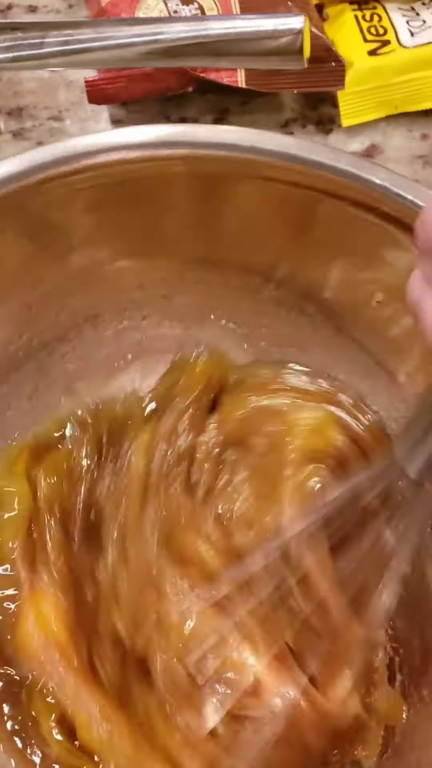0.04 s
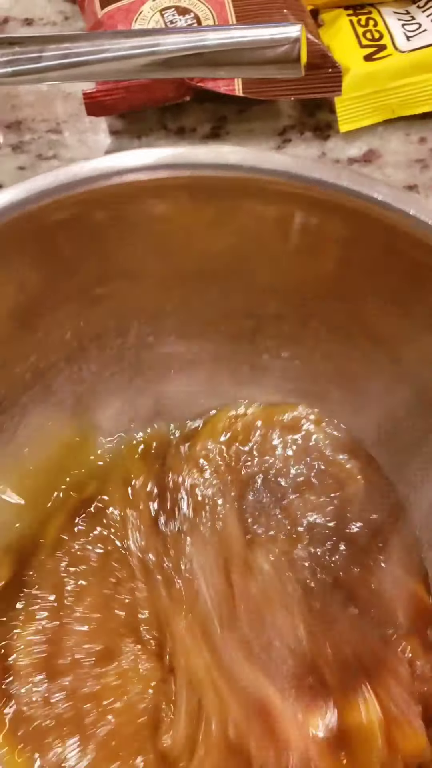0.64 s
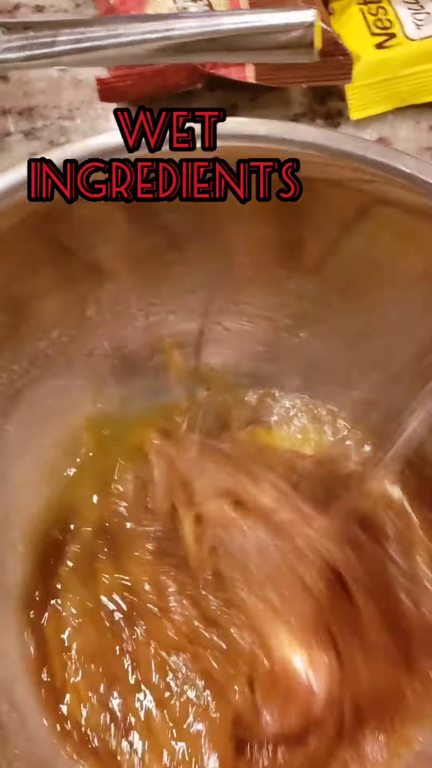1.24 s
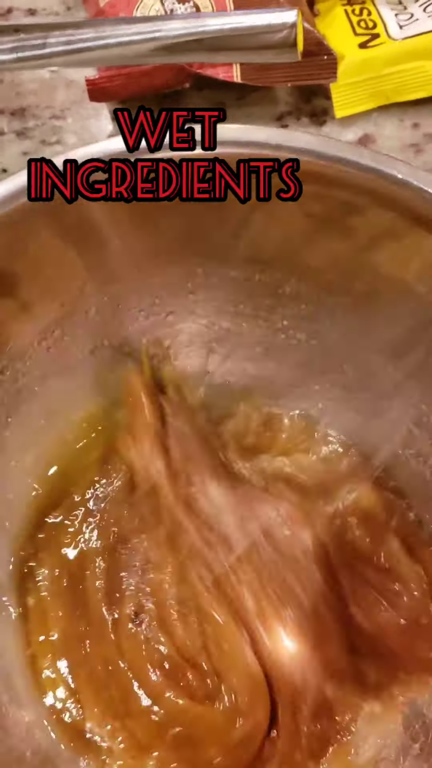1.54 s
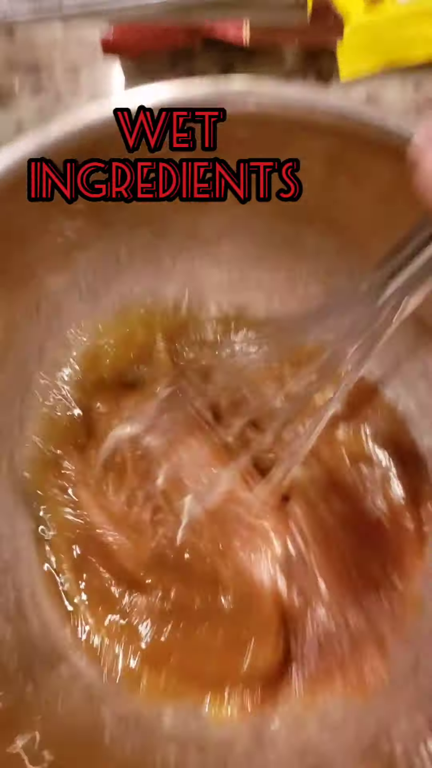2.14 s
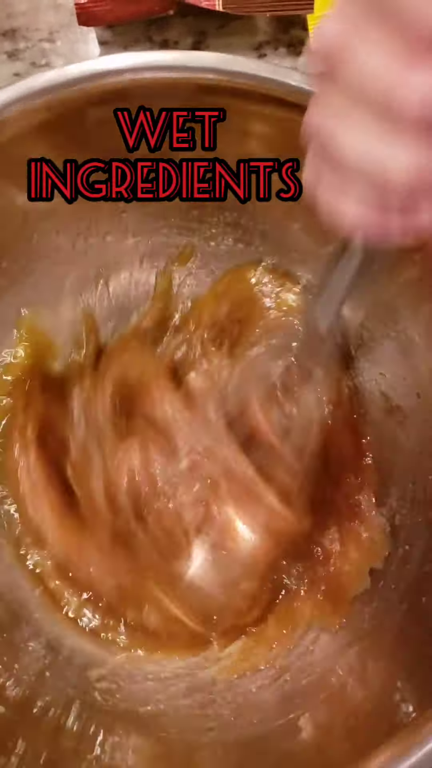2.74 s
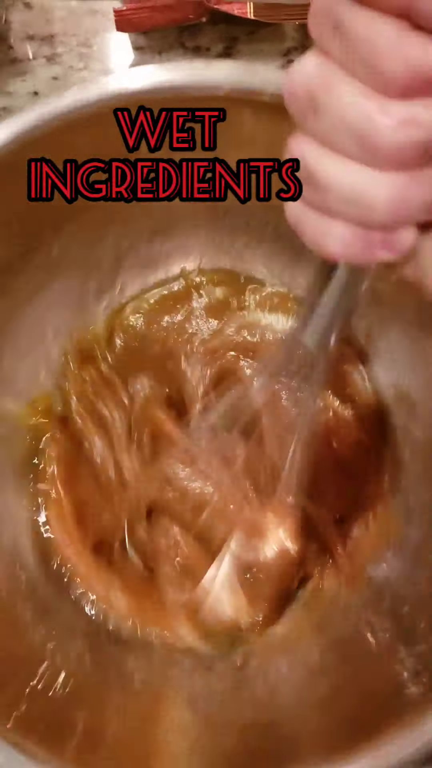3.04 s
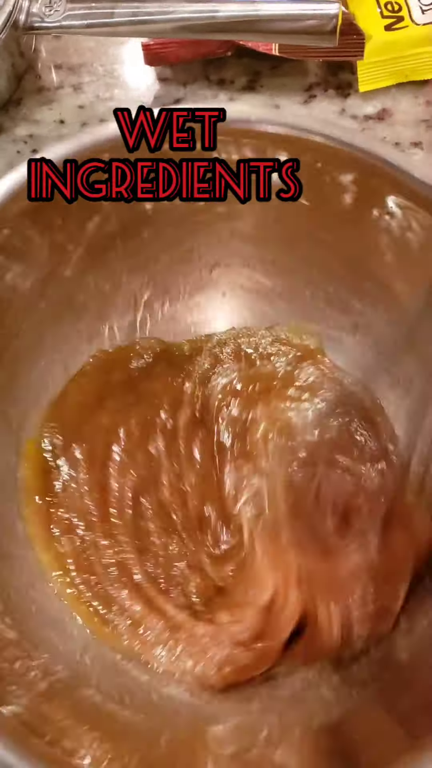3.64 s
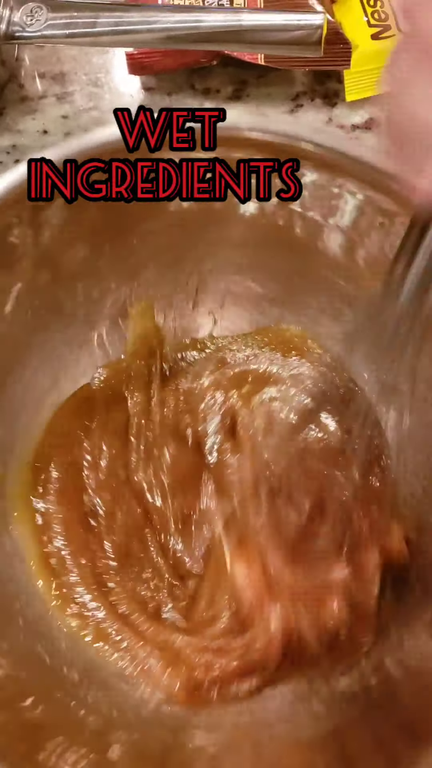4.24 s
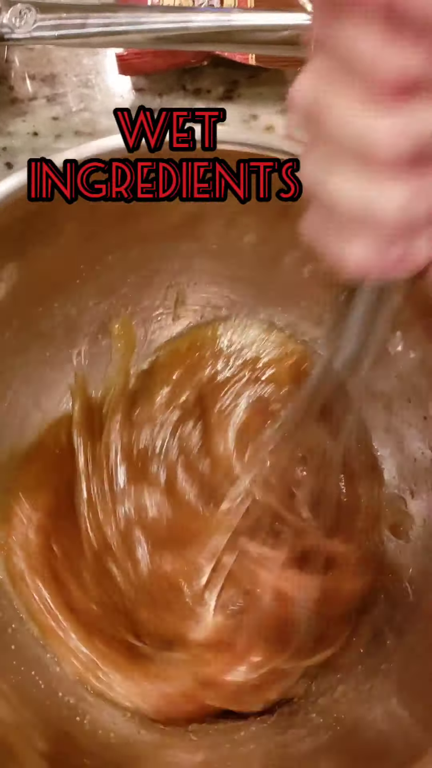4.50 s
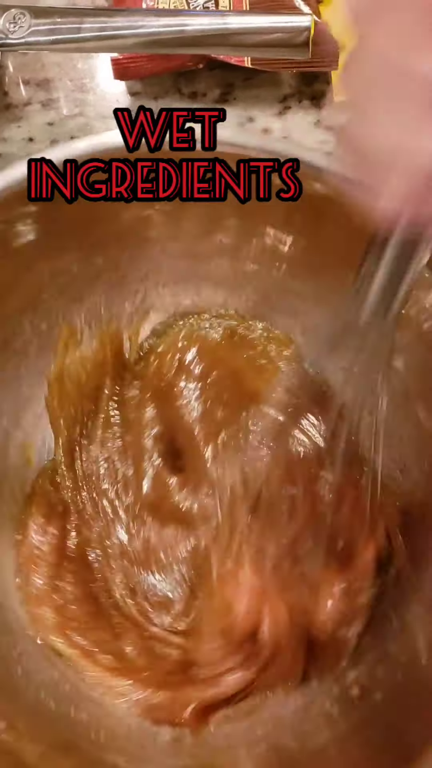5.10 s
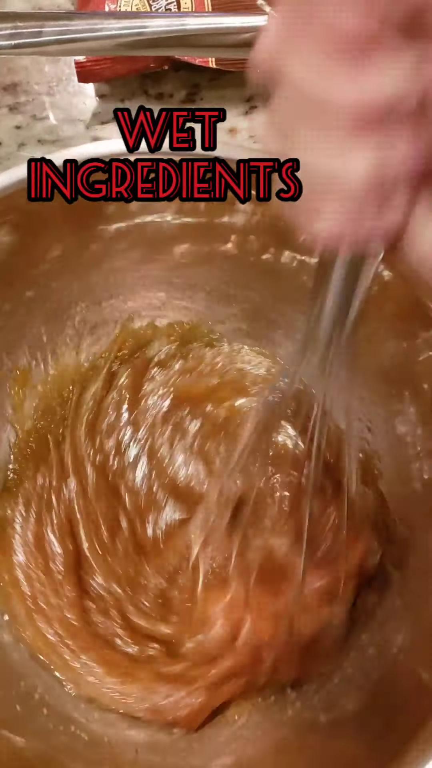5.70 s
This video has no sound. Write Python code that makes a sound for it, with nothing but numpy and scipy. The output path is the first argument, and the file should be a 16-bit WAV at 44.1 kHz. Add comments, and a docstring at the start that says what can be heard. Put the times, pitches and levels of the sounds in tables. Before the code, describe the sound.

From the first moment, a wire whisk beats runny batter in a steel bowl, quickly and evenly, at about seven strokes a second. Each stroke is a bright, sizzling scrape with a small rattle, joined by rounded wet plops, short squelches and a fine crackle of bubbles. Dull clicks of coated wire come irregularly. A short, high metallic ping sounds right at the start, with a few lighter ones around 0.6, 1.7 and 2.8 seconds. From about 3.5 seconds the pings come more often, the clearest near 3.9, 5.1 and 5.2 seconds. Underneath, the bowl hums softly and rocks on the counter with faint low thuds. The whisking keeps its pace until about 6 seconds, easing slightly in the last strokes. Everything is heard from close above, with the short echo and faint hush of a small kitchen.

```python
"""Quick, wet scraping and plopping: a wire whisk beats runny batter in a steel bowl, about seven strokes a second.
In each stroke the wires scrape, rattle and tap along the steel. Now and then one hits the bare wall and pings.
Air pockets in the batter close with plops and squelches, and small bubbles pop and crackle.
Underneath, the bowl hums and rocks on the counter. It is all heard from close above, in a small kitchen."""
import sys
import numpy as np
from scipy import signal
from scipy.fft import rfft, irfft
from scipy.io import wavfile
from scipy.ndimage import uniform_filter1d

SR = 44100
rng = np.random.default_rng(int(sys.argv[2]) if len(sys.argv) > 2 else 0)


def inscribe(sig):
    """Save sig as 16-bit PCM at rate SR to the path in sys.argv[1].

    A 1-D sig is mono; a 2-D sig holds one channel per row.
    Samples are clipped to [-1, 1] before scaling.
    """
    pcm = np.round(np.clip(np.atleast_2d(sig).T, -1, 1) * 32767)
    wavfile.write(sys.argv[1], SR, pcm.astype(np.int16))


N = 262836

# Levels in the tables are relative. fade_s is the time a sound takes to die away by 60 dB.
# One turn of the whisk: the wires bite as they land, drag, then bunch up and skip before they lift.
# start_s, drag_db, bite_db, skip_after_s, skip_db
STROKES = [(.015, -34, -33, 0.051, -28.5), (0.159, -37.5, -25.5, 0.054, -25), (0.307, -36, -49, 0.057, -36),
           (.456, -37.5, -20.5, 0.043, -24.5), (0.598, -35, -36, 0.034, -26),
           (.737, -34, -26.5, 0.03, -17.5), (0.873, -33, -22, 0.031, -16.5),
           (1.014, -29.5, -26, 0.029, -21), (1.152, -30, -43, .028, -18.5), (1.292, -29, -28.5, 0.033, -18),
           (1.430, -31, -36, 0.031, -18.5), (1.569, -30.5, -22, .043, -22.5),
           (1.722, -36, -19.5, .047, -25), (1.863, -35, -53, 0.039, -21), (2.007, -38, -26.5, 0.05, -23.5),
           (2.171, -34.5, -39, 0.034, -29), (2.310, -35.5, -32, .055, -15), (2.463, -34, -29.5, 0.03, -48),
           (2.594, -33.5, -22, 0.047, -22), (2.746, -35, -26.5, .044, -29.5),
           (2.889, -33, -28.5, 0.03, -32.5), (3.03, -31.5, -36, 0.031, -23.5),
           (3.183, -37, -27, 0.048, -29), (3.335, -36, -34, 0.042, -25.5), (3.47, -38, -29, 0.052, -21),
           (3.63, -38, -26, 0.051, -55), (3.767, -35.5, -51, .040, -22.5), (3.898, -30.5, -43, 0.054, -44),
           (4.052, -35, -28.5, .050, -19.5), (4.212, -30, -25.5, 0.03, -20.5),
           (4.356, -36.5, -27, 0.037, -24.5), (4.492, -31, -39, 0.042, -39), (4.634, -32, -40, 0.044, -20),
           (4.77, -33.5, -50, 0.033, -22.5), (4.917, -41, -41, 0.056, -24), (5.052, -31, -26.5, 0.062, -39),
           (5.213, -37.5, -29, 0.054, -25), (5.361, -37.5, -27, 0.047, -25),
           (5.488, -38, -36, 0.074, -22.5), (5.65, -36, -49, 0.057, -36), (5.786, -38.5, -29, 0.059, -30),
           (5.933, -44, -47, 0.022, -30.5)]
# Taps of a batter-coated wire: start_s, level_db
TAPS = [(0.162, -26), (.342, -24), (.631, -22), (0.74, -30), (0.948, -22.5), (1.157, -26), (1.433, -29),
        (1.946, -29), (2.206, -21), (2.245, -28), (2.466, -28), (2.744, -26), (2.948, -26), (3.134, -36),
        (3.186, -21), (4.151, -34), (4.364, -37), (4.943, -22), (5.525, -21)]
# A wire hits the bare wall: start_s, level_db
PINGS = [(0.014, -13.5), (0.596, -23.5), (1.725, -18.5), (2.751, -23.5), (3.518, -23), (3.631, -26),
         (3.8987, -9.5), (4.63, -16), (4.922, -14.5), (5.054, -10), (5.2126, -9.5), (5.491, -13.5),
         (5.648, -20), (5.787, -16.5)]
# The tones of wire ringing on steel: pitch_hz, level_db, fade_s
STEEL_TONES = [(6530, -25, 0.0089), (6150, 5, 0.051), (6640, 19, 0.032), (6620, 17, 0.038),
               (6230, 0, 0.054)]
# Large air pockets closing in the batter: start_s, level_db, squelch_db
PLOPS = [(.035, -24.5, -27), (.168, -26.5, -35), (.211, -23.5, -55), (.312, -23, -42), (.372, -37, -56),
         (.460, -18.5, -29.5), (.496, -26, -46), (.634, -14.5, -45), (.739, -21, -35), (.760, -21, -40),
         (.878, -14.5, -37), (.899, -17, -34), (1.017, -22.5, -32), (1.155, -21.5, -31.5),
         (1.178, -19.5, -39), (1.298, -18.5, -32), (1.386, -27.5, -54), (1.436, -18, -34),
         (1.460, -24.5, -48), (1.575, -11, -35), (1.610, -20, -40), (1.729, -16.5, -27.5),
         (1.864, -30, -42), (1.899, -21.5, -46), (2.010, -22, -43), (2.048, -23.5, -45), (2.177, -20, -32),
         (2.316, -22.5, -40), (2.360, -22.5, -30), (2.430, -24, -42), (2.466, -23, -45), (2.505, -18, -37),
         (2.568, -23, -42), (2.597, -16, -23.5), (2.636, -23.5, -39), (2.755, -20, -31.5),
         (2.787, -29, -53), (2.896, -17, -36), (2.989, -25, -47), (3.053, -12.5, -23), (3.132, -14, -30.5),
         (3.195, -24.5, -28.5), (3.339, -22.5, -27.5), (3.430, -19.5, -39), (3.472, -19, -26.5),
         (3.520, -25.5, -31), (3.592, -17.5, -33.5), (3.631, -16.5, -31.5), (3.726, -25, -43.5),
         (3.776, -23, -28), (3.802, -24.5, -34), (3.927, -19, -33), (3.959, -25, -32), (4.004, -26.5, -43),
         (4.055, -18.5, -27), (4.096, -23.5, -27.5), (4.218, -13, -28), (4.242, -19.5, -30),
         (4.286, -26, -50), (4.358, -19, -25), (4.501, -21.5, -30.5), (4.674, -24.5, -27),
         (4.733, -23, -47), (4.778, -19.5, -37), (4.804, -22, -34), (4.867, -18.5, -44), (4.947, -23, -30),
         (4.968, -23.5, -48), (5.088, -18, -26.5), (5.115, -24, -40), (5.173, -19.5, -40),
         (5.230, -22.5, -29.5), (5.263, -12.5, -47), (5.361, -27.5, -24.5), (5.411, -26.5, -39),
         (5.468, -28, -48), (5.528, -25, -44), (5.565, -25.5, -43), (5.672, -30.5, -34), (5.704, -26, -42),
         (5.755, -31.5, -61), (5.819, -27, -36.5), (5.840, -24.5, -39)]
# How deep the whisk digs, as the strength of the low plops and thuds: time_s, level_db
WHISK_DEPTH = [(0, 6), (1.0, -1), (2.0, -4), (3.1, 3), (3.7, 6.5), (4.5, -2.5), (5.25, 2.5), (5.9, -5)]
# The clearest bubbles bursting: start_s, level_db, pitch_hz
POPS = [(0.74, -22.5, 1570), (2.744, -27.5, 2070), (2.948, -34, 1220), (3.097, -29.5, 1310),
        (3.552, -32, 1810), (3.922, -24.5, 1260), (4.942, -20, 1105), (5.075, -22.5, 1160),
        (5.219, -27, 1200), (5.52, -23, 1123), (5.665, -26.5, 1470)]
# The tones of the hollow of the bowl with batter in it: pitch_hz, level_db, fade_s
BOWL_TONES = [(318.7, -23, 0.15), (392.2, -18.5, 0.13), (425, -25.5, 0.065), (505, -37, 0.24),
              (596.5, -18, 0.11)]
# How strong each of four noises is, from bass to treble: frequency_hz, level_db
SCRAPE_SPECTRUM = [(700, -9), (1400, -2.5), (1950, 0), (2600, -8), (3350, 5.5), (4000, -1.5), (5100, -2),
                   (6000, 4), (6600, 8), (7400, -6.5), (8400, -13), (10800, -1), (13000, -1.5), (15500, -2)]
SQUELCH_SPECTRUM = [(300, -34), (600, 4.5), (820, -8.5), (1060, 1), (1350, -11), (1900, -21.5), (3000, -27),
                    (8000, -56)]
THUD_SPECTRUM = [(25, -24), (60, -2), (100, 6), (160, 8.5), (260, -12.5), (400, 6), (1000, -36)]
ROOM_SPECTRUM = [(25, -21), (60, 1), (95, -6), (200, -5.5), (500, -4.5), (1000, -19.5), (3000, -28.5),
                 (6500, -24), (8500, -42), (15000, -24.5)]
# How long the kitchen echoes: frequency_hz, fade_s
ECHO_FADES = [(200, 0.35), (550, 0.41), (1400, 0.15), (4000, 0.24), (12000, 0.22)]

BITE_AFTER_S, BITE_S, SKIP_S = 0.00745, 0.0099, 0.0094   # when the bite peaks; how long bite and skip last
LIFT_AFTER_S = 0.0086   # the whisk lifts this long after the skip
PLUNGE_HZ, WAKE_HZ, POCKET_GROWTH_S = 493.2, 433.4, 0.024   # plop pitch early and late in a stroke
SMALL_PLOP_DB, SMALL_SQUELCH_DB = -31, -43.5   # every skip also traps a small pocket
TYPICAL_PLOP_DB, PLOP_FADE_S, SNAP_SHARE = -21, .04, .3   # louder pockets snap shut faster
FAINT_POP_DB, FAINT_POP_HZ, FAINT_POP_AFTER_S = -46, 1380, 0.057   # one faint pop follows each stroke


def drag_force(rise_s, release_s):
    """The wires press on the steel at once, hold past the skip and let go as the whisk lifts."""
    force, t = np.zeros(N), seconds(.2)
    for start, drag_db, _, skip_after_s, _ in STROKES:
        lifted_s = np.maximum(t - skip_after_s - LIFT_AFTER_S, 0)
        add(force, start, from_db(drag_db) * np.minimum(t / rise_s, 1) * np.exp(-lifted_s / release_s))
    return force


def wire_pressure(force, rattle_db):
    """The steady drag of each stroke, with one short burst as the wires bite and another as they skip."""
    bursts, t = np.zeros(N), seconds(.04) - .02
    for start, _, bite_db, skip_after_s, skip_db in STROKES:
        for after_s, db, length_s in (BITE_AFTER_S, bite_db, BITE_S), (skip_after_s, skip_db, SKIP_S):
            add(bursts, start + after_s + t[0], from_db(db) * np.exp(-2 * (t / length_s) ** 2))
    return np.hypot(force, from_db(rattle_db) * bursts)


def wire_scrape(pressure, level_db, hard_db):
    """The wires stick and slip on the steel; the harder they press, the more they sizzle."""
    grain = flicker(tiny_hits(per_s=8000, spread_db=4.5), depth_db=8.5, hold_s=.006)
    scrape = from_db(level_db) * colour(pressure * grain, SCRAPE_SPECTRUM)
    hardness = (pressure / from_db(hard_db)) ** 0.39
    sizzle = pressure * hardness * tiny_hits(per_s=7700, spread_db=16.0)
    return (scrape + high_pass(sizzle, edge_hz=13600)) * pan(left_db=3.5)


def flicker(x, depth_db, hold_s):
    """Each narrow band of pitch swells and sinks by itself as the wet wires move over the steel."""
    out, rest = 0, x
    steps = np.arange(N) / SR / hold_s
    for edge_hz in np.geomspace(14000, 900, 13):
        lower = signal.sosfiltfilt(signal.butter(2, edge_hz, fs=SR, output="sos"), rest)
        swings = np.clip(rng.standard_normal(int(N / SR / hold_s) + 2), -1.8, 1.8)
        out = out + (rest - lower) * from_db(depth_db * np.interp(steps, np.arange(len(swings)), swings))
        rest = lower
    return rms_one(out + rest)


def wire_taps(decay_s, level_db):
    """Batter stops a wire from ringing, leaving only a hard click."""
    out, t = np.zeros((2, N)), seconds(.02)
    for start, db in TAPS:
        add(out, start, from_db(db + level_db) * np.exp(-t / decay_s) * rng.standard_normal((2, len(t))))
    return colour(out, SCRAPE_SPECTRUM)


def wire_pings(ring_db, tick_db, chatter_s, detune):
    """A wire chatters on bare steel: a bright tick and a short ring, a little different for each wire."""
    out, t = np.zeros((2, N)), seconds(.08)
    for start, db in PINGS:
        chatter = rng.standard_normal((2, len(t))) * np.exp(-t / chatter_s)
        tuning = 1 + detune * rng.standard_normal()
        tone = sum(from_db(tone_db) * ring(chatter, hz * tuning, fade_s)
                   for hz, tone_db, fade_s in STEEL_TONES)
        tone = np.array([rms_one(channel) for channel in tone])
        tick = rms_one(signal.lfilter([1, -2, 1], [1], chatter))   # keeps the treble
        add(out, start, from_db(db) * (from_db(ring_db) * tone + from_db(tick_db) * tick))
    return out * pan(left_db=4.5)


def air_pockets():
    """Pockets grow, so sound lower, as a stroke goes on. Rows: start_s, level_db, pitch_hz, squelch_db."""
    stroke_starts = np.array([start for start, *_ in STROKES])
    small = [(start + skip_after_s, SMALL_PLOP_DB, SMALL_SQUELCH_DB)
             for start, _, _, skip_after_s, _ in STROKES]
    start_s, level_db, squelch_db = np.transpose(PLOPS + small)
    stroke = np.searchsorted(stroke_starts, start_s + BITE_S) - 1
    age_s = np.maximum(start_s - stroke_starts[stroke], 0)
    pitch_hz = WAKE_HZ + (PLUNGE_HZ - WAKE_HZ) * np.exp(-age_s / POCKET_GROWTH_S)
    return np.column_stack([start_s, level_db, pitch_hz, squelch_db])


def bubble(hz, fade_s, rise_s, glide, wobble):
    """Trapped air rings briefly in the batter; its pitch wavers and climbs as the pocket closes."""
    t = seconds(.1)
    waver = rms_one(uniform_filter1d(rng.standard_normal(len(t)), size=80))
    climb = np.minimum(t / fade_s, 1) - .25
    pitch_hz = hz * (1 + glide * climb + wobble * np.clip(waver, -2, 2))
    swell = (1 - np.exp(-(t / rise_s) ** 2)) * from_db(-60 * t / fade_s)
    return swell / swell.max() * np.sin(2 * np.pi * np.cumsum(pitch_hz) / SR)


def plops(pockets, depth, level_db, trough_db, trough_ratio, split_db):
    """Each pocket rings, the trough behind the whisk rings lower, and bits the wires cut off ring higher."""
    rings, troughs = np.zeros(N), np.zeros(N)
    for start, db, hz, _ in pockets:
        stretch = from_db(SNAP_SHARE * (TYPICAL_PLOP_DB - db))
        gain, fade_s = from_db(db) / np.sqrt(stretch), PLOP_FADE_S * stretch
        add(rings, start, gain * bubble(hz, fade_s, rise_s=0.0021 * stretch, glide=0.088, wobble=0.14))
        trough = bubble(hz * trough_ratio, fade_s=0.048, rise_s=0.0025, glide=0.074, wobble=0.1)
        add(troughs, start, gain * from_db(trough_db) * trough)
        for later, higher in rng.random((2, 2)):
            split = bubble(hz * (1.25 + 0.54 * higher), fade_s=0.014, rise_s=0.0011, glide=0.094, wobble=0.12)
            add(rings, start + later * fade_s / 4, gain * from_db(split_db) * split)
    batter = from_db(level_db) * (rings + depth * troughs)[None]
    return high_pass(batter, edge_hz=252)   # pockets this small give off little deep bass


def squelches(pockets, rise_s, decay_s, level_db):
    """Around each pocket the batter tears into a spray of small bubbles."""
    spray, t = np.zeros(N), seconds(.08)
    burst = (1 - np.exp(-t / rise_s)) * np.exp(-t / decay_s)
    for start, _, _, squelch_db in pockets:
        add(spray, start, from_db(squelch_db + level_db) * burst)
    middle, side = colour(spray * tiny_hits(per_s=3600, spread_db=4.0), SQUELCH_SPECTRUM)
    side = high_pass(side, edge_hz=850)   # the low part is alike on left and right
    return np.array([middle + side, middle - side]) * pan(left_db=-6.0)


def pops(cycles, level_db):
    """Small bubbles chirp upwards as they burst at the surface."""
    out = np.zeros(N)
    faint = [(start + FAINT_POP_AFTER_S * rng.uniform(.8, 1.4), FAINT_POP_DB,
              FAINT_POP_HZ * rng.uniform(0.74, 1.21)) for start, *_ in STROKES]
    for start, db, hz in POPS + faint:
        chirp = bubble(hz, fade_s=cycles / hz, rise_s=0.00014, glide=0.079, wobble=.1)
        add(out, start, from_db(db + level_db) * chirp)
    return out * pan(left_db=-15.0) * [[-1], [1]]   # here the bowl sends opposite waves left and right


def crackle(pressure, per_s, cycles, level_db):
    """The wires squeeze tiny bubbles out of the wet film; each rings briefly at one of many pitches."""
    pitches_hz = np.geomspace(1350, 4600, 24)
    bursts = pressure * tiny_hits(per_s, spread_db=2.0)
    choice = rng.integers(0, len(pitches_hz), N)
    rings = sum(ring(bursts * (choice == k), hz, cycles / hz) * np.sqrt(hz / cycles / SR)
                for k, hz in enumerate(pitches_hz))
    wide = rings - 0.16 * rings[::-1]   # left and right partly oppose each other
    return from_db(level_db) * wide * pan(left_db=-1.0)


def bowl_hum(push, level_db):
    """The hollow of the bowl hums on after each push."""
    return from_db(level_db) * sum(from_db(db) * ring(push, hz, fade_s) for hz, db, fade_s in BOWL_TONES)


def thuds(batter, level_db):
    """The shoved batter rocks the bowl against the counter."""
    shove = np.sqrt(np.abs(uniform_filter1d(batter ** 2, size=700)))
    return from_db(level_db) * colour(shove * rng.standard_normal((1, N)), THUD_SPECTRUM)


def kitchen_echo(x, delay_s):
    """Sound bounces around the room in a blur; each band of pitch dies away at its own speed."""
    t = seconds(.4)
    centres_hz, fades_s = np.transpose(ECHO_FADES)
    edges_hz, tail = np.geomspace(100, 18000, 9), 0
    for low, high in zip(edges_hz, edges_hz[1:]):
        band_pass = signal.butter(2, [low, high], "band", fs=SR, output="sos")
        band = signal.sosfilt(band_pass, rng.standard_normal((len(x), len(t))))
        fade_s = np.interp(np.log(low * high) / 2, np.log(centres_hz), fades_s)
        tail = tail + band * from_db(-60 * t / fade_s)
    tail = tail * np.clip(t / delay_s - 1, 0, 1)
    return signal.fftconvolve(x, rms_one(tail) / np.sqrt(len(t)), axes=-1)[:, :N]


def room_noise(level_db):
    """The faint, steady hush of the kitchen, mostly alike on left and right."""
    air = rng.standard_normal((1, N)) + from_db(-9.5) * rng.standard_normal((2, N))
    return from_db(level_db) * colour(air, ROOM_SPECTRUM)


def tiny_hits(per_s, spread_db):
    """Tiny random hits of uneven size; the curved steel sends each differently to left and right."""
    sizes = from_db(spread_db * np.clip(rng.standard_normal(N), -2, 2))
    return rms_one((rng.random(N) < per_s / SR) * sizes * rng.standard_normal((2, N)))


def ring(x, hz, fade_s):
    """Each click in x sets one pure, fading tone ringing."""
    decay, angle = from_db(-60 / (fade_s * SR)), 2 * np.pi * hz / SR
    return signal.lfilter([0, np.sin(angle)], [1, -2 * decay * np.cos(angle), decay * decay], x + 1e-18)


def colour(x, spectrum, size=4096):
    """Shape the bass and treble of a sound to follow a spectrum; white noise keeps its level."""
    hz, db = np.transpose(spectrum)
    gain = rms_one(from_db(np.interp(np.log(np.fft.rfftfreq(size, 1 / SR) + 1), np.log(hz), db)))
    cepstrum = irfft(np.log(gain))[:size // 2]   # one half only, so nothing sounds before its cause
    cepstrum[1:] *= 2
    click_response = irfft(np.exp(rfft(cepstrum, size)))
    return signal.fftconvolve(x, click_response[None], axes=-1)[:, :N]


def high_pass(x, edge_hz):
    """Gently turn down everything below the edge."""
    return signal.sosfilt(signal.butter(2, edge_hz, "high", fs=SR, output="sos"), x)


def pan(left_db):
    """Left and right gains that make the left louder by left_db."""
    return from_db(np.array([[left_db], [-left_db]]) / 2)


def to_stereo(x, left_db, lag_s):
    """One sound reaches both channels, a little later on the right."""
    t = np.arange(N) / SR
    return np.array([x[0], np.interp(t - lag_s, t, x[0])]) * pan(left_db)


def add(track, start_s, sound):
    """Mix a sound into a track at a time."""
    i = int(np.clip(round(start_s * SR), 0, N - 1))
    track[..., i:i + sound.shape[-1]] += sound[..., :N - i]


def from_db(db):
    """Turn decibels into a gain."""
    return 10 ** (np.asarray(db) / 20)


def rms_one(x):
    """Scale to an average (rms) level of 1."""
    return x / np.sqrt(np.mean(x ** 2) + 1e-20)


def seconds(length_s):
    """The time of each sample."""
    return np.arange(int(length_s * SR)) / SR


def scene():
    """Mix the bright sounds of steel and bubbles, the low sounds of batter and bowl, and the kitchen."""
    force = drag_force(rise_s=0.004, release_s=0.015)
    pressure = wire_pressure(force, rattle_db=-1.0)
    depth = from_db(np.interp(np.arange(N) / SR, *np.transpose(WHISK_DEPTH)))
    steel = wire_scrape(pressure, level_db=1.0, hard_db=-20.5) + wire_taps(decay_s=0.001, level_db=6.5)
    steel = steel + wire_pings(ring_db=-15.0, tick_db=-24.5, chatter_s=0.0044, detune=0.0158)
    pockets = air_pockets()
    wet = squelches(pockets, rise_s=0.00013, decay_s=0.0094, level_db=4.0) + pops(cycles=33, level_db=2.5)
    bright = steel + wet + crackle(pressure, per_s=900, cycles=40, level_db=8.0)
    batter = plops(pockets, depth, level_db=6.5, trough_db=-12.5, trough_ratio=0.612, split_db=-12.0)
    rubbing = force * rng.standard_normal((1, N))
    hum = bowl_hum(batter, level_db=-39.5) + bowl_hum(rubbing, level_db=-10.5)
    low = batter + hum + thuds(depth * batter, level_db=-25.0)
    low = low + from_db(-14.5) * kitchen_echo(low, delay_s=0.0039)
    bright = bright + from_db(-12.5) * kitchen_echo(bright, delay_s=0.0029)
    return bright + to_stereo(low, left_db=-3.5, lag_s=0.0001) + room_noise(level_db=-48.0)


def record(dry):
    """The very top of the treble, above 15900 Hz, is cut steeply."""
    return signal.sosfilt(signal.ellip(10, .2, 70, 15900, fs=SR, output="sos"), dry)


dry = scene()
out = record(dry)
inscribe(out)
```